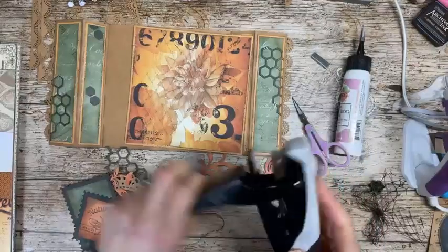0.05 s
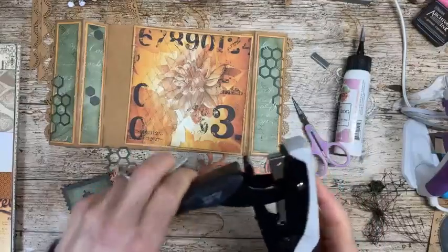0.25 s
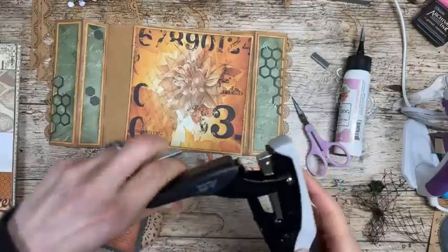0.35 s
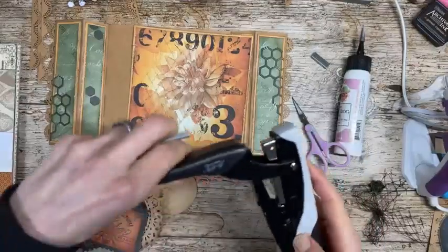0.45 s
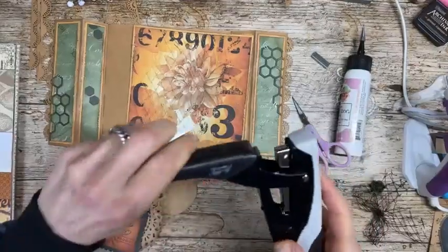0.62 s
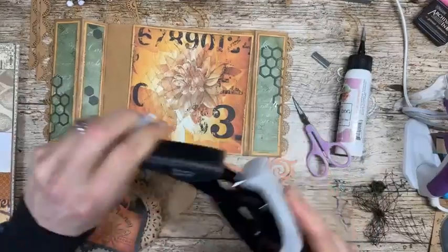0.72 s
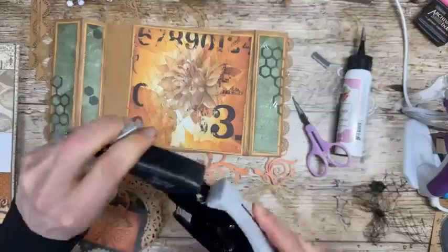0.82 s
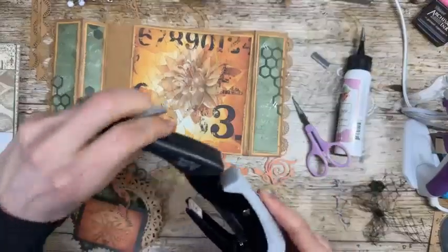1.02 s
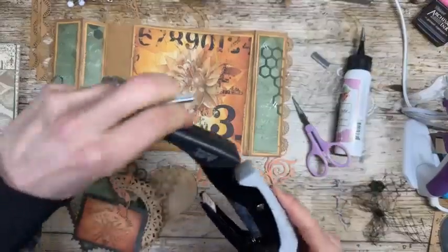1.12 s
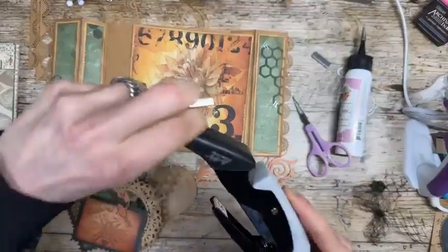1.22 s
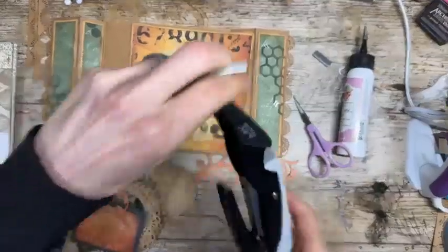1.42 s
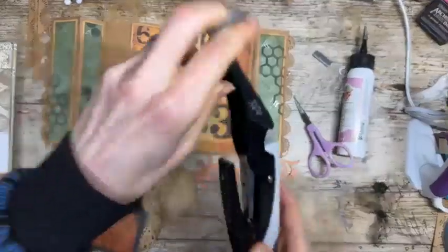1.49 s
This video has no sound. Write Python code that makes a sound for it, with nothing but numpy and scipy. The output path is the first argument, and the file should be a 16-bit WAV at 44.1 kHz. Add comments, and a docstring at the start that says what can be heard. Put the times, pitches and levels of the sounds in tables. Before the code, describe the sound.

A handheld stapler is swung open, snapping sharply and clattering close up in a quiet room

```python
"""A stapler is swung open close to the microphone: its latch and spring snap and rattle.
Each snap is a dense run of uneven ticks around one harder blow, ringing the plastic and metal body.
Fingers rub faintly on the body as fine noise grains; a separate treble hiss swells and fades.
A small quiet room answers with distinct returns, strong near 4 and 20 ms, and a sparse dying tail.
Underneath lie a two-tone machine hum, a low rumble and a steady hiss."""
import sys
import numpy as np
from scipy import signal
from scipy.fft import rfft, irfft
from scipy.io import wavfile
from scipy.ndimage import uniform_filter1d

SR = 44100
rng = np.random.default_rng(int(sys.argv[2]) if len(sys.argv) > 2 else 0)


def master(y):
    """Save y as 16-bit WAV."""
    cut = np.clip(np.atleast_2d(y).T, -1, 1)
    pcm = np.round(cut * 32767)  # scale
    wavfile.write(sys.argv[1], SR, pcm.astype(np.int16))


N = 68355


def amp(db):
    """Decibels to a linear gain."""
    return 10 ** (np.asarray(db, float) / 20)


def evened(x):
    """Scales a signal to an RMS of one."""
    return x / np.sqrt(np.mean(x ** 2) + 1e-20)


def read(points, hz):
    """Reads (freq_hz, value) points along a logarithmic frequency axis."""
    point_hz, value = np.transpose(points)
    return np.interp(np.log(hz + 1), np.log(point_hz + 1), value)


def curve(table, column=1):
    """Joins one column of a timed table by straight lines, sample by sample."""
    return np.interp(np.arange(N) / SR, [row[0] for row in table], [row[column] for row in table])


def coloured(x, points):
    """Shapes the spectrum by (freq_hz, gain_db) points."""
    gain = amp(read(points, np.fft.rfftfreq(x.shape[-1], 1 / SR)))
    return irfft(rfft(x) * gain, x.shape[-1])


# Snaps of the latch and spring: start_s, pitch (factor on the body modes), wall_db (send to the
# room against the direct sound), level_db (before colour), rise_s, rattle_t60_s,
# blow_db (against four times the ticks' RMS), then eight colour_db, one per band of BAND_HZ
SNAPS = [(.190, 1.02, 2, -34.5, 0.024, 0.011, 4, -29.5, -23, -8.5, -11, -7, -7.5, -11, -12),
         (.2030, 0.97, -1, -17.5, 0.00092, .016, 3.5, -17.5, -18.5, 4.5, 3, 1, -0.5, -5, -5.5),
         (0.2718, 0.95, -7, -30.5, 0.0025, 0.02, 0.5, -16.5, -8, -0.5, -18, 4.5, 3, -9.5, -12),
         (0.3114, 1.034, -3, -34, .0015, 0.023, 0, -18, -5.5, 4.5, 9, 8, 8.5, 7.5, 3),
         (.4722, 1.06, -2.5, -42, .007, 0.035, -8, -22.5, -7, 4, 7.5, 2, 7.5, 4.5, 0.5),
         (.859, 1.043, -3.5, -38.5, .006, 0.025, -14, -17, -11, 1.5, -0.5, 1.5, 3, 3, 1.5),
         (1.045, 1.2, -3, -53.5, 0.0047, 0.014, 9, -8.5, -3, 17, 8, 5, 5, -4.5, -2.5),
         (.629, 0.89, -6, -73, .002, 0.034, -1.5, -25, -30, 10.5, -2.5, -7.5, 2, -12, 3),
         (.695, 1.01, -6, -71, 0.001, 0.026, -13, -29.5, -15, 4, -8, 8, 11.5, -5, 4.5),
         (0.917, 0.99, 1.5, -61.5, 0.00072, 0.045, 3, -11, -1, 9.5, 8, 5, 13, 6, -13),
         (0.984, 1.3, -2, -76, .001, .02, -10, -22, -31, -12, -9, -6, -23, -5, -9),
         (1.124, 0.95, -3, -66, 0.0012, 0.02, 6, -25, -14, -1, -13.5, -13, -20.5, -19, -18),
         (1.298, 1.02, -4.5, -78, .001, .02, 4, -20, -21, 15, -3, 9, -11, -9, 2),
         (1.433, 1.12, -3.5, -67, 0.00083, 0.019, 0.5, -16, -24, -0.5, -6, 9.5, -3.5, -13.5, -8),
         (1.467, 1.22, -8, -78, 0.0008, 0.012, 5, -25, -38, 13, -3, 19, -8, -12, -14)]
TICKS_PER_S, TICK_SPREAD_DB = 11000, 4.5  # average density; spread per natural-log unit
SAME_WAY = .7  # chance that a tick pushes the positive way
SLIDE_DB = -9.5  # level at the start of the rise, against its end
PRE_ROLL = 64  # samples kept ahead of each strike


def snaps():
    """Parts slide in, strike and rattle; returns the direct sound and the send to the walls."""
    out = np.zeros((2, N))
    t = np.arange(3072) / SR
    for start_s, pitch, wall_db, level_db, rise_s, t60_s, blow_db, *colour_db in SNAPS:
        chance, size, way = rng.random((3, len(t)))
        hits = chance < TICKS_PER_S / SR
        sizes = amp(-TICK_SPREAD_DB * np.log(size + .03))
        ticks = evened(hits * sizes * np.sign(SAME_WAY - way))
        ticks[round(rise_s * SR)] = 4 * amp(blow_db)

        slide_db = SLIDE_DB * np.maximum(1 - t / rise_s, 0)
        rattle_db = -60 * np.maximum(t - rise_s, 0) / t60_s
        shape = amp(level_db + slide_db + rattle_db)
        ring = body(colour_db, pitch)
        sound = signal.fftconvolve(shape * ticks, ring)
        # pin the energy, so chance ticks do not move the level
        sound *= np.linalg.norm(shape) * np.linalg.norm(ring) / np.linalg.norm(sound)

        part = out[:, round(start_s * SR) - PRE_ROLL:][:, :len(sound)]
        part += amp([[0], [wall_db]]) * sound[:part.shape[1]]
    return out


# Ringing modes of the stapler body: freq_hz, level_db (relative), t60_s
BODY = [(330, -7.5, 0.026), (520, -10.5, 0.026), (864, -19, 0.0027), (1065, -25, 0.0027),
        (1710, -0.5, 0.0074), (1932, 0, 0.011), (2310, 0.5, 0.0056), (2607, -4, 0.011), (3300, -1, .007),
        (3703, -5.5, 0.016), (4644, -3.5, 0.0054), (4700, -6.5, 0.013), (6385, -6, 0.0071),
        (6940, -3, 0.0023), (11000, -14.5, 0.003), (10650, -20, 0.0089)]
# Centres of the colour bands: freq_hz
BAND_HZ = [400, 1000, 1900, 2900, 3900, 5500, 8000, 11500]
CRACK_DB = -0.5  # dry click against the whole ring, before colour
THUMP_FLOOR_DB = -29.5  # colour at 80 Hz against the lowest band


def body(colour_db, pitch):
    """Short decaying modes plus a dry crack after one tick, coloured by where it is struck."""
    t = np.arange(2048) / SR
    ring = np.zeros(len(t))
    for k, (freq_hz, level_db, t60_s) in enumerate(BODY):
        fade = amp(level_db - 60 * t / t60_s)
        ring += (-1) ** k * fade * np.sin(2 * np.pi * pitch * freq_hz * t)
    crack = amp(CRACK_DB) * (t == 0)
    strike = ring / np.linalg.norm(ring) + crack
    colour = [(80, colour_db[0] + THUMP_FLOOR_DB)] + list(zip(BAND_HZ, colour_db))
    return coloured(np.roll(strike, PRE_ROLL), colour)


# Levels of the finger rub and of the separate treble hiss: time_s, rub_db, treble_hiss_db
RUB_AND_TREBLE = [(0, -78.5, -100), (.05, -114.5, -140), (.17, -85, -77.5), (.3, -80, -105),
                  (.44, -94, -72), (.58, -81, -93), (.66, -87, -106), (.69, -83.5, -82), (.8, -75.5, -76.5),
                  (.85, -79.5, -79), (.98, -68, -75.5), (1.04, -89.5, -85.5), (1.13, -72.5, -88.5),
                  (1.2, -121, -100), (1.225, -80, -90), (1.285, -89, -99.5), (1.34, -92.5, -94),
                  (1.38, -96.5, -96.5), (1.43, -83.5, -93), (1.49, -88.5, -94.5), (1.52, -97, -101)]
# Colour of the rubbed body: colour_db, one per band of BAND_HZ
RUB_COLOUR = [-32, -22, 1.5, -7.5, -5.5, -10, -19, -30]


def rub():
    """Skin slips on the stapler in fine noise grains that ring the body."""
    swell = evened(uniform_filter1d(rng.standard_normal(N), 300))  # wanders over about 7 ms
    grains = rng.standard_normal(N) * amp(3.5 * swell)
    rubbed = evened(signal.fftconvolve(grains, body(RUB_COLOUR, 0.99))[:N])
    return amp(curve(RUB_AND_TREBLE)) * rubbed


# Spectrum of the treble hiss: freq_hz, gain_db (relative)
TREBLE_HISS = [(3000, -27), (5000, 2.5), (8000, -1.5), (13000, -2.5)]


def treble_hiss():
    """Noise shaped to the treble that swells and fades beside the rubbing, on its own level curve."""
    noise = evened(coloured(rng.standard_normal(N), TREBLE_HISS))
    return amp(curve(RUB_AND_TREBLE, column=2)) * noise


# Single wall returns: delay_s, level_db (before colour)
ECHOES = [(.0042, -9), (0.016, -12), (.0156, -22.5), (.0171, -15.5), (.0198, -8), (.0211, -18),
          (.0228, -16), (.030, -20.5)]
# Tail decay: freq_hz, t60_s (at the starting rate, before the bend hastens it)
TAIL = [(400, 0.52), (900, .4), (1500, .33), (3000, .3), (6000, 0.27), (12000, .3)]
# Colour of all that returns: freq_hz, gain_db
ECHO_COLOUR = [(300, -1.5), (900, 6.5), (2000, -0.5), (5000, 5), (8000, 0.5), (12000, -2)]
TAIL_START_S, TAIL_DB = .01, -6  # level of the whole tail, before colour
TAIL_BEND = 0.83  # weight of the cubic term that hastens the decay


def room(x):
    """A few distinct returns over sparse random taps that die ever faster, band by band."""
    taps = np.zeros(SR // 2)
    at = np.arange(0, len(taps) - 20, 20)
    taps[at + rng.integers(0, 20, len(at))] = rng.choice([-1., 1.], len(at))

    hz, t, bands = signal.stft(taps, SR, nperseg=256)
    age = t / read(TAIL, hz)[:, None]
    fade = amp(-60 * (age + TAIL_BEND * age ** 3))
    tail = signal.istft(bands * fade, SR, nperseg=256)[1][:len(taps)]

    tail *= amp(TAIL_DB) / np.linalg.norm(tail)
    response = np.r_[np.zeros(round(TAIL_START_S * SR)), tail]
    for delay_s, level_db in ECHOES:
        response[round(delay_s * SR)] += amp(level_db)
    return coloured(signal.fftconvolve(x, response)[:N], ECHO_COLOUR)


# Machine hum: time_s, pitch_hz (first tone), first_tone_db, second_tone_db (RMS)
HUM = [(0.0, 87.6, -87, -73.5), (0.024, 84, -61.5, -82.5), (0.12, 86, -86, -113),
       (0.272, 83.05, -66.5, -70.5), (0.422, 83.05, -86, -93), (0.504, 84.64, -74.5, -75.5),
       (0.564, 85.5, -79.5, -97), (0.638, 85.4, -86.5, -88), (0.716, 85.45, -76, -75),
       (0.82, 81.72, -84, -69), (0.876, 83, -72, -67.5), (0.992, 82.7, -77.5, -69), (1.018, 83.4, -63, -71),
       (1.036, 83.45, -73.5, -71), (1.38, 82.73, -65, -73.5), (1.55, 81, -62, -77)]


def hum():
    """Two sine tones of a distant machine, an octave apart, drift in pitch, swell and fade."""
    turns = np.cumsum(curve(HUM)) / SR
    tones = np.zeros(N)
    for k in (1, 2):
        level = np.sqrt(2) * amp(curve(HUM, column=k + 1))
        tones += level * np.sin(2 * np.pi * (k * turns + rng.random()))
    return tones


# Rumble over time: time_s, level_db
RUMBLE = [(0.0, -77), (0.164, -73.5), (0.24, -68.5), (0.534, -80), (0.738, -74), (0.918, -72.5),
          (1.26, -72.5), (1.466, -69.5), (1.55, -64.5)]
# Rumble spectrum: freq_hz, gain_db (relative)
RUMBLE_SHAPE = [(25, -27.5), (38, -12.5), (52, 5.5), (65, -7), (100, 1), (130, -1.5), (200, -10), (270, -9),
                (310, -24.5), (600, -45)]


def rumble():
    """Low noise, shaped in spectrum, whose level wanders."""
    return amp(curve(RUMBLE)) * evened(coloured(rng.standard_normal(N), RUMBLE_SHAPE))


# Steady hiss spectrum: freq_hz, density_db (per Hz, relative)
HISS = [(180, -36), (300, -2.5), (507, -9), (1550, -15.5), (1960, -23), (3020, -15.5), (5190, -22.5),
        (9970, -39.5), (13500, -28.5)]
HISS_DB = -82


def hiss():
    """Steady noise, shaped in spectrum and thinned in the bass."""
    return amp(HISS_DB) * evened(coloured(rng.standard_normal(N), [(100, -30.5)] + HISS))


# Stereo width: freq_hz, side_db (against mid)
WIDTH = [(3000, -74), (4500, -31.5), (8000, -22), (12000, -15)]


def widened(mid):
    """Smears the sound by a short noise burst into a side signal, added left and taken off right."""
    smear = rng.standard_normal(400) * amp(-12 * np.arange(400) / 400)
    smeared = signal.fftconvolve(mid, smear / np.linalg.norm(smear))[100:N + 100]
    side = coloured(smeared, WIDTH)
    return np.array([mid + side, mid - side])


def scene():
    """Snaps, rub and treble hiss, direct and through the room, over hum, rumble and steady hiss."""
    near, walls = snaps() + rub() + treble_hiss()  # the last two feed both paths alike
    return widened(near + room(walls) + hum() + rumble() + hiss())


# A dip in the microphone's treble: freq_hz, gain_db
MIC = [(8400, 0.5), (9200, -5), (9900, 0.5)]
EDGE_HZ = 13300  # upper band limit


def record(dry):
    """Microphone colour, then a steep low-pass as the band limit."""
    low_pass = signal.firwin(255, EDGE_HZ, window=("kaiser", 9), fs=SR)
    return signal.oaconvolve(coloured(dry, MIC), low_pass[None], "same")


dry = scene()
out = record(dry)
master(out)
```